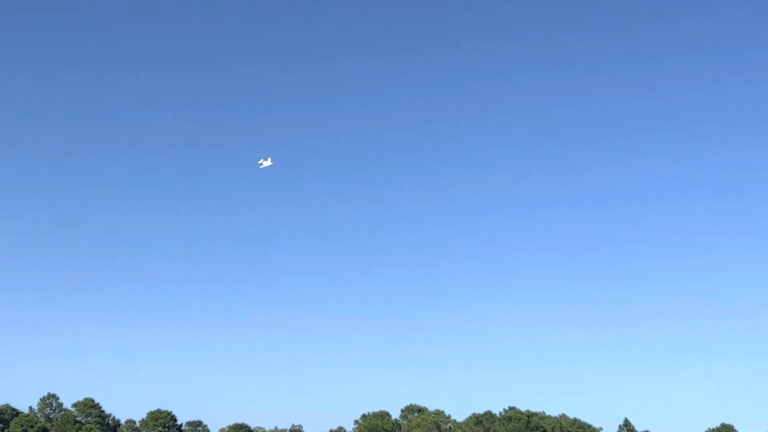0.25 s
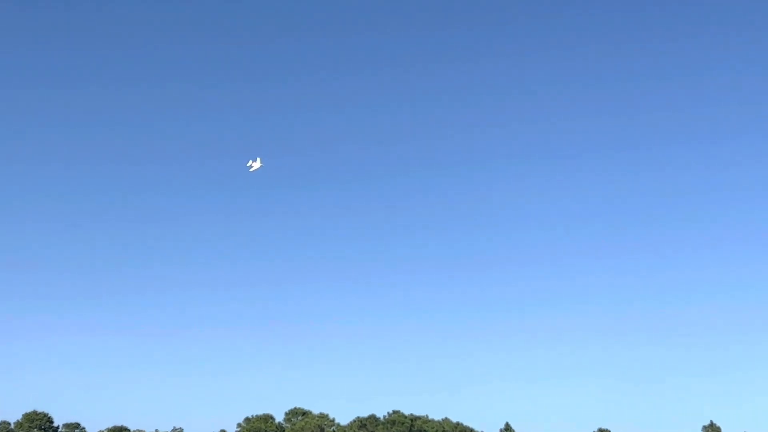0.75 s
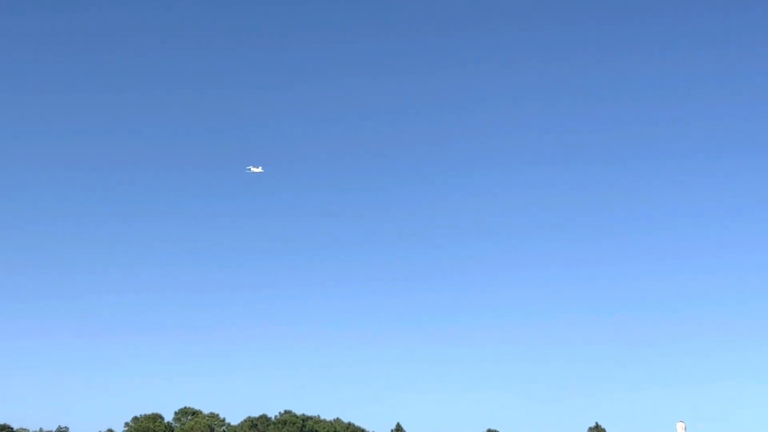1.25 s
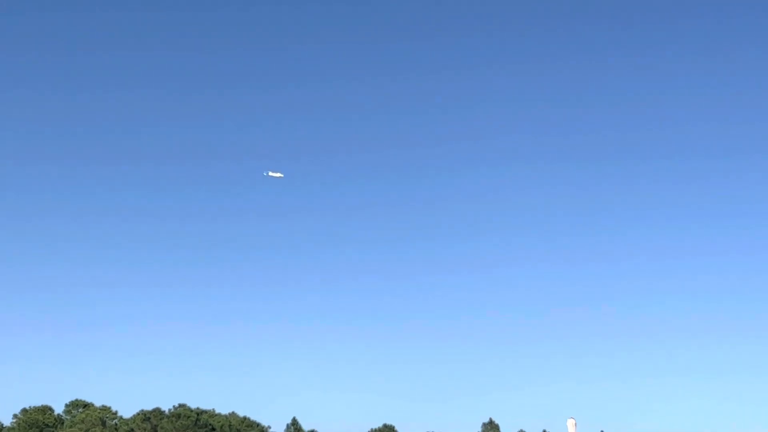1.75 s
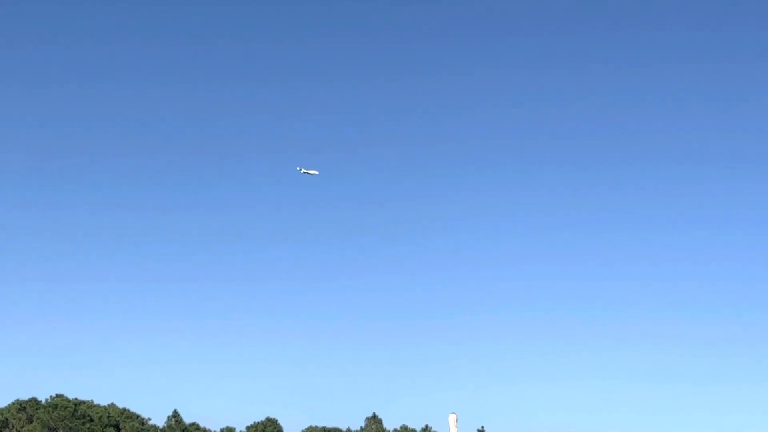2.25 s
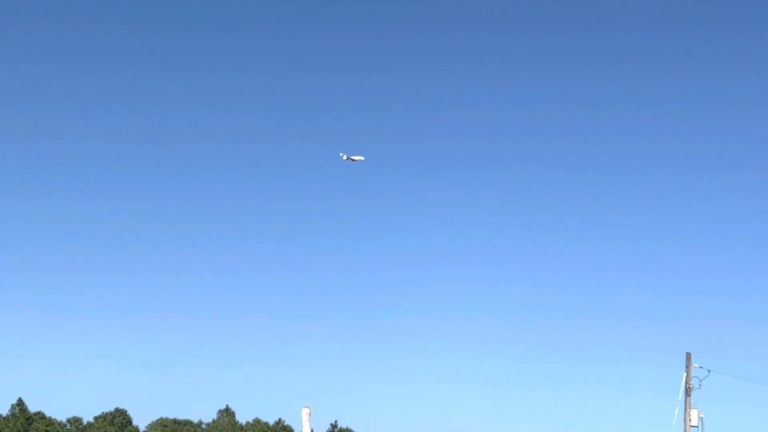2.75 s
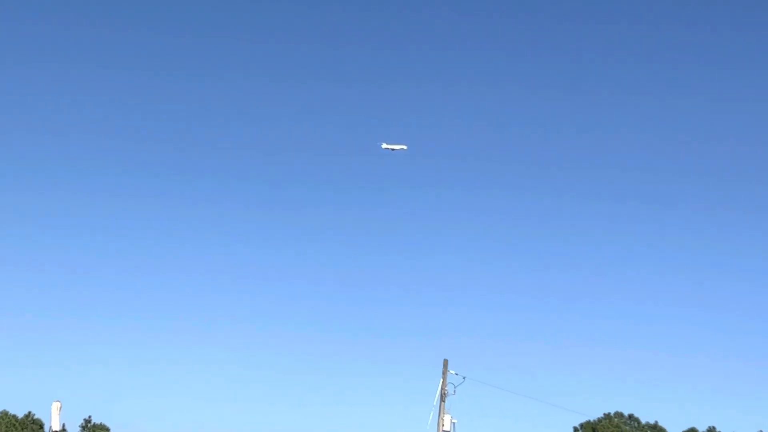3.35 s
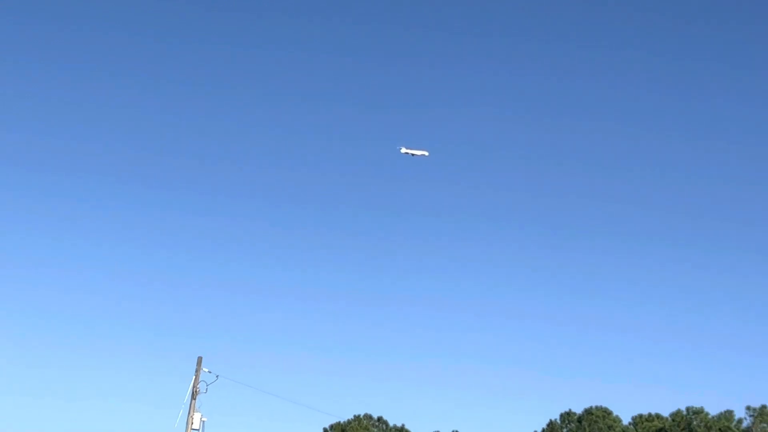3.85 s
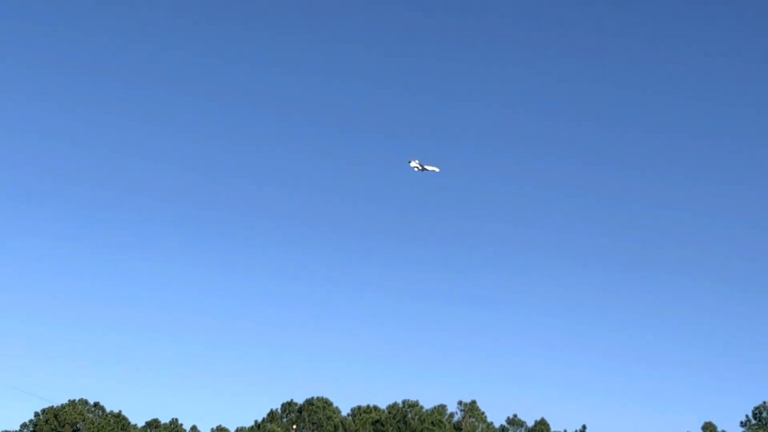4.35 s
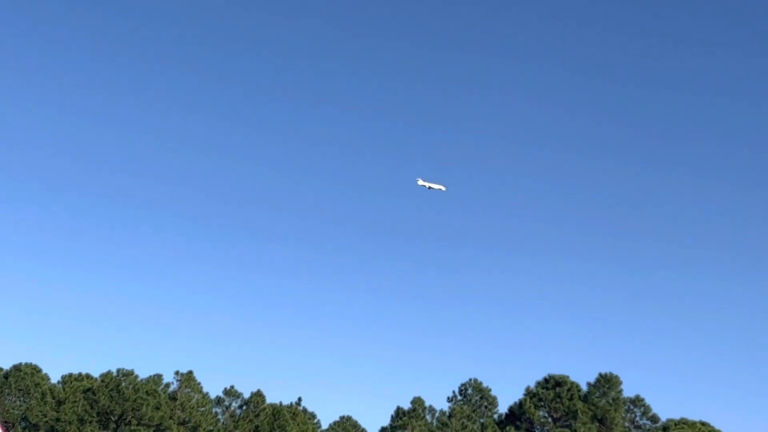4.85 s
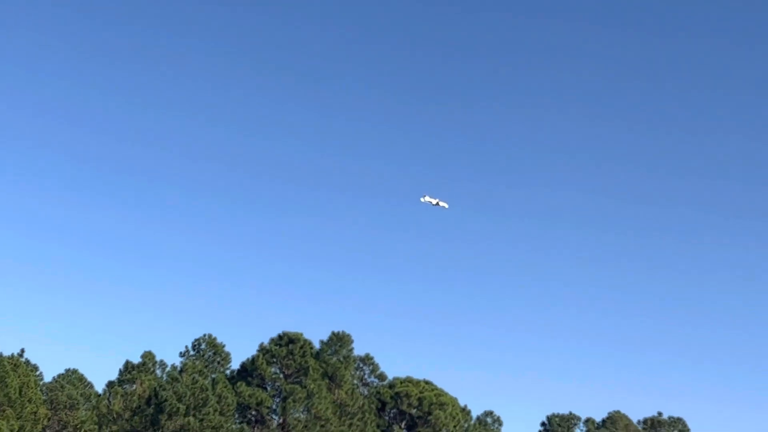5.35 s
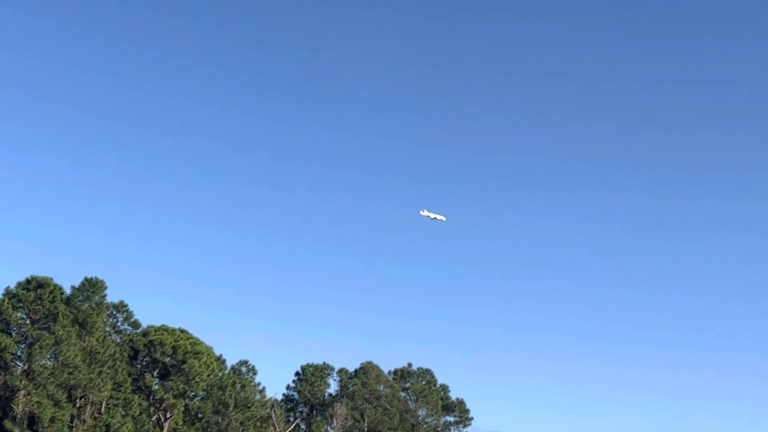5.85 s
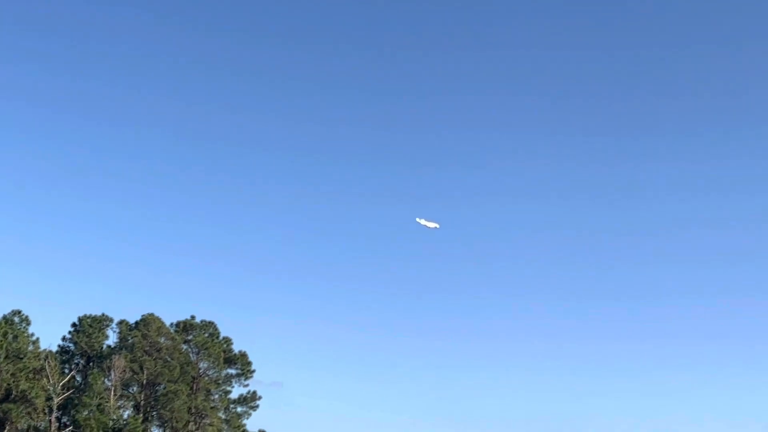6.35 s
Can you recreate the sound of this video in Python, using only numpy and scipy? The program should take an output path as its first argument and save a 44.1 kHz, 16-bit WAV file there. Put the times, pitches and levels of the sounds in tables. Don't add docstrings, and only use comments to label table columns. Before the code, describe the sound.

Outdoors under open sky, a small twin-fan electric model jet passes at a distance. Its high whine flickers in brief beams over a soft duct rush, sags slightly in pitch, then jumps up in two quick steps and becomes stronger and steadier. Wind thumps, flutters and pops on the camera's stereo microphones, heaviest near the end, with one small handling knock early on and faint hiss beneath.

```python
import sys
import numpy as np
from scipy import signal
from scipy.fft import rfft, irfft, next_fast_len
from scipy.io import wavfile
from scipy.ndimage import uniform_filter1d, map_coordinates

SR = 44100
rng = np.random.default_rng(int(sys.argv[2]) if len(sys.argv) > 2 else 0)


def put_to_file(sound):
    columns = np.atleast_2d(sound).T
    safe = np.clip(columns, -1, 1)
    whole_steps = np.round(safe * 32767)
    wavfile.write(sys.argv[1], SR, whole_steps.astype(np.int16))


def decibels_to_gain(level_db):
    exponent = np.asarray(level_db, float) / 20
    return 10 ** exponent


N = 291143

# time in seconds, blade-passing rate in Hz.
BLADE_HZ = [(0.0, 4980), (0.36, 4980), (0.46, 4835), (0.9, 4854), (1.5, 4914), (2.2, 4925), (2.9, 4880),
            (3.9, 4741), (5.0, 4584), (5.225, 4567), (5.32, 4896), (5.45, 4960), (5.54, 5100), (5.61, 5430),
            (5.782, 5540), (5.858, 5928), (6.05, 5922), (6.6, 5863)]
# frequency in Hz, density in dB per Hz.
THUMP = [(15, -120), (25, -27.5), (40, -5.5), (70, 2.5), (120, -2), (200, -17.5), (400, -120)]
# frequency in Hz, density in dB per Hz.
FLUTTER = [(60, -120), (120, 0.5), (200, 1), (350, -5.5), (550, -16), (900, -120)]


def unit(x):
    return x / np.sqrt(np.mean(x ** 2) + 1e-20)


def steady(x, seconds):
    power = np.abs(uniform_filter1d(x ** 2, int(seconds * SR)))
    return unit(x / np.sqrt(power + 1e-20))


def curves(rows):
    s, *cols = np.transpose(rows)
    return [np.interp(np.arange(N) / SR, s, c) for c in cols]


def along(points, hz, axis=1):
    rows = np.transpose(points)
    return np.interp(np.log(hz + 1), np.log(rows[0] + 1), rows[axis])


def wobble(rate):
    coarse = np.arange(0, N + 64, 32)
    knots = rng.standard_normal(int(N * rate / SR) + 4)
    return np.interp(np.arange(N), coarse, map_coordinates(knots, [coarse * rate / SR]))


def bumps(rows, sharp):
    s, fall_s, db = np.transpose(rows)[:, :, None]
    t = np.arange(0, N / SR + .01, .005)
    return t, db - 10 * np.abs((t - s) / np.maximum(fall_s, .03)) ** sharp


def swells(rows, sharp=1.3):
    t, db = bumps(rows, sharp)
    return np.interp(np.arange(N) / SR, t, 20 * np.log10(decibels_to_gain(db).sum(0) + 1e-6))


def filtered(x, response):
    m = next_fast_len(N + 8192)
    return irfft(rfft(x, m) * response(np.fft.rfftfreq(m, 1 / SR)), m)[..., :N]


def shaped_noise(spectrum):
    return filtered(rng.standard_normal(N), lambda hz: decibels_to_gain(along(spectrum, hz)))


def causal(spectrum):
    size = 8192
    cep = irfft(np.log(decibels_to_gain(along(spectrum, np.fft.rfftfreq(size, 1 / SR))) + 1e-4), size)
    cep[1:size // 2] *= 2
    cep[size // 2 + 1:] = 0
    pulse = irfft(np.exp(rfft(cep)), size)
    return pulse / np.abs(pulse).max()


def through(x, spectrum):
    return signal.fftconvolve(x, causal(spectrum))[:N]


def sine(hz, db):
    return np.sqrt(2) * decibels_to_gain(db) * np.sin(2 * np.pi * (np.cumsum(hz) / SR + rng.random()))


def blade_rate():
    inertia_s = .04
    return uniform_filter1d(curves(BLADE_HZ)[0], round(inertia_s * SR))


def fans():
    # peak in seconds, time to fall 10 dB in seconds, peak in dB.
    whine = [(.1, .12, -70.5), (.29, .04, -66), (.57, .05, -75), (.72, .1, -70), (.95, .05, -56),
             (1.1, .06, -66), (1.44, .06, -61), (1.6, .1, -66), (1.93, .13, -61), (2.18, .08, -68),
             (2.28, .03, -58), (2.45, .12, -73), (2.68, .08, -73), (3, .12, -69), (3.15, .1, -68),
             (3.3, .11, -64), (3.45, .06, -70), (3.57, .04, -61), (3.7, .08, -66), (3.9, .12, -63),
             (4, .06, -61), (4.14, .08, -56), (4.28, .06, -61), (4.46, .07, -68), (4.6, .05, -65),
             (4.72, .05, -66), (4.82, .04, -62), (4.89, .04, -60), (4.96, .05, -64), (5.03, .04, -66),
             (5.225, .05, -57.5), (5.33, .05, -63), (5.43, .06, -52), (5.56, .035, -60), (5.66, .05, -68),
             (5.79, .04, -64), (5.88, .05, -50), (5.98, .06, -54), (6.12, .06, -57), (6.27, .1, -55),
             (6.46, .12, -51), (6.6, .1, -52), (1.9, 1.5, -82)]
    # peak in seconds, time to fall 10 dB in seconds, peak in dB.
    octave = [(.73, .04, -77), (.98, .1, -77), (1.15, .06, -78), (1.5, .17, -75), (1.85, .12, -85),
              (2.25, .06, -81), (3.35, .07, -78), (3.48, .05, -79), (3.87, .17, -74), (4.14, .14, -71),
              (4.42, .17, -74), (4.7, .14, -73), (4.93, .12, -67), (5.13, .055, -61), (5.36, .08, -73),
              (5.5, .05, -72), (5.61, .05, -65), (5.68, .04, -69), (5.75, .05, -65), (5.82, .04, -64),
              (5.88, .045, -54), (6.08, .08, -68), (6.25, .1, -52), (6.38, .04, -57), (6.5, .1, -55)]
    # peak in seconds, 10 dB fall in seconds, peak in dB.
    other_lobes = [
        [(.68, .08, -77), (1.3, .25, -73), (2.3, .3, -83), (3.2, .15, -67), (3.5, .15, -66), (3.8, .4, -70),
         (4.3, .4, -71), (5.1, .08, -65), (5.24, .09, -58), (5.96, .06, -76)],
        [(0, .4, -62), (1.8, .6, -59), (3.4, .6, -59), (4.2, .5, -55), (5.15, .4, -61), (6.1, .3, -58)],
        [(5.68, .15, -72), (5.95, .2, -67), (6.25, .3, -65)],
        [(2.6, .4, -77)],
        [(5.6, .12, -78), (6.34, .15, -65)],
        [(5.87, .04, -74), (5.96, .07, -73), (6.27, .12, -77)],
        [(3.6, .3, -93), (4.15, .1, -86), (4.6, .3, -90), (4.97, .06, -82), (5.13, .07, -70), (5.35, .1, -81)],
        [(1.1, .3, -84), (1.7, .4, -84), (2.3, .15, -80)],
        [(.2, .25, -87), (2.8, .3, -82)],
    ]
    twin_settles_s = (5.55, 5.8)
    lag_cruise, lag_full = .0035, .0095
    twin_cruise_db, twin_full_db = -12, -10

    t = np.arange(N) / SR
    shaft_hz = blade_rate() / 12
    twin_hz = shaft_hz * (1 - np.interp(t, twin_settles_s, [lag_cruise, lag_full]))
    twin_db = np.interp(t, twin_settles_s, [twin_cruise_db, twin_full_db])
    calm_db = np.where(shaft_hz > 485, 1.9, np.where(shaft_hz > 418, 4, 2.9))
    out = np.zeros(N)
    for order, lobes in zip([12, 24, 6, 1, 4, 5, 13, 16, 36, 7, 8], [whine, octave] + other_lobes):
        lobe_db = swells(lobes)
        rotors = [(shaft_hz, -1.5)]
        if order in (1, 4, 12, 24):
            rotors.append((twin_hz, twin_db + 7 * (order == 4) - 5 * (order == 24)))
        depth = np.clip(order / 12, .9 * (order > 1), 1) ** .5 * (.4 if order == 24 else 1)
        jitter = .0015 if order == 6 else .0005
        for rotor_hz, rotor_db in rotors:
            air = wobble(36)
            fades = air - .3 * (air ** 2 - .6) + .5 * wobble(70)
            hz = order * rotor_hz * (1 + jitter * wobble(20))
            out += sine(hz, lobe_db + rotor_db + calm_db * depth * fades)
    return out


def whistles():
    # peak in seconds, time to fall 10 dB in seconds, peak in dB.
    switch_lobes = [
        (5.62, .04, -63),
        (5.68, .05, -60),
        (5.75, .05, -63),
        (5.89, .03, -63),
        (5.97, .04, -65),
        (6.03, .02, -64),
        (6.2, .12, -73),
    ]
    # middle in seconds, 10 dB fall in seconds, peak in dB, middle in Hz, glide in Hz per second.
    glides = [
        (5.4, .05, -77, 2050, 900),
        (5.5, .04, -65, 2250, 2700),
        (5.87, .02, -72, 2280, 4500),
        (5.95, .06, -72, 2370, 300),
        (5.63, .04, -70, 5110, 4000),
        (5.76, .11, -71, 5310, 900),
        (5.56, .06, -76, 5560, 3000),
        (5.95, .1, -80, 5420, 0),
        (5.07, .1, -75, 4965, -120),
    ]
    switch_hz = 7735
    t = np.arange(N) / SR
    tones = [(switch_hz - blade_rate(), switch_lobes)]
    for s, fall_s, db, hz, glide in glides:
        tones.append((hz + glide * (t - s), [(s, fall_s, db)]))
    out = np.zeros(N)
    for hz, lobes in tones:
        level_db = swells(lobes, sharp=2.5) + 2.5 * wobble(40)
        out += sine(hz * (1 + .003 * wobble(30)), level_db)
    return out


def rush():
    # frequency in Hz, density in dB per Hz.
    roar_cruise = [(250, -120), (400, -22.5), (560, 3.5), (800, -1.5), (1100, 5), (1500, -12),
                   (2200, -27.5), (3000, -120)]
    roar_full = [(250, -120), (500, -5.5), (1050, -2), (1430, 0.5), (1800, -8), (2500, -15), (3200, -120)]
    hiss = [(900, -120), (1500, 9.5), (2400, 6), (3500, 4.5), (5000, 5), (6500, -8), (8500, -120)]
    fizz = [(4000, -120), (6000, 6), (8000, 3.5), (10000, -8), (12000, 3), (15000, -8.5), (16000, -120)]
    # time in seconds, level in dB.
    nearness = [(0, -76), (.55, -80.5), (.95, -72), (1.3, -70), (1.7, -77), (2.2, -74.5), (2.55, -68.5),
                (3.2, -68), (4.0, -69.5), (4.7, -72), (5.1, -72), (5.45, -77), (5.9, -67.5), (6.35, -65.5),
                (6.6, -69.5)]
    # middle in s, half length in s, change in dB.
    pockets = [(0, 0.026, 12), (0.07, 0.1, -6), (0.28, 0.038, 8.5), (.48, .08, -3), (0.674, 0.1, 7.5),
               (0.84, 0.072, -6), (0.957, 0.047, 6.5), (1.28, 0.16, -6.5), (1.42, 0.064, 6.5),
               (1.115, 0.037, 1), (1.608, 0.066, 2.5), (1.71, 0.024, 0), (1.77, 0.041, 6.5),
               (1.925, 0.098, 6), (2.147, 0.044, -10), (2.295, 0.03, 6.5), (2.358, 0.076, -6.5),
               (2.72, 0.026, 1.5), (2.823, 0.083, -12), (3.503, 0.028, 4), (3.633, 0.032, -6),
               (3.786, 0.033, 0), (4.13, 0.034, -1), (4.312, 0.028, 2), (4.26, 0.073, -4),
               (4.456, 0.055, 3), (4.683, 0.055, -5), (5.002, 0.4, 5), (5.12, .03, 6.5), (5.32, .03, 3),
               (5.366, .025, 1), (5.568, 0.17, 10), (5.68, 0.025, -9), (5.87, 0.029, 2),
               (6.097, 0.045, -1.5), (6.177, 0.036, 0), (6.25, .04, 0), (6.386, 0.12, 2),
               (6.514, 0.052, -3), (5.236, .04, 2.5), (4.993, .03, 0.5)]
    # time in seconds, delay in ms.
    bounce = [(0, 1.5), (.9, 1.45), (2.1, 1.46), (3, 1.59), (3.35, 1.75), (3.9, 1.88), (4.8, 1.92),
              (5.8, 1.7), (6.05, 1.52), (6.35, 1.42), (6.6, 1.4)]
    cruise_hz, full_hz = 5050, 5900
    pocket_hiss, pocket_roar = .52, .16

    near_db, = curves(nearness)
    t, shape_db = bumps([(s, half_s, 0) for s, half_s, db in pockets], sharp=2.4)
    clear_db = np.interp(np.arange(N) / SR, t, np.transpose(pockets)[2] @ decibels_to_gain(shape_db))
    full = np.clip((curves(BLADE_HZ)[0] - cruise_hz) / (full_hz - cruise_hz), 0, 1)
    roar_db = near_db + pocket_roar * clear_db
    hiss_db = near_db + 2 + pocket_hiss * clear_db
    fizz_db = -79.5 + .91 * (near_db + 71) + 8 * full + clear_db + 2.2 * wobble(11)
    gust = wobble(16)
    late = np.arange(N) - curves(bounce)[0] * SR / 1000
    # spectrum, gain, ground reflection share, gust scatter in dB; faster air lifts the roar in pitch
    layers = [(roar_cruise, decibels_to_gain(roar_db + 12) * np.sqrt(1 - full), .6, .8),
              (roar_full, decibels_to_gain(roar_db + 8) * np.sqrt(full), .75, .8),
              (hiss, decibels_to_gain(hiss_db), .5, .9),
              (fizz, decibels_to_gain(fizz_db), .45, 1.5)]
    out = np.zeros(N)
    for spectrum, gain, ground, gust_db in layers:
        direct = shaped_noise(spectrum)
        reflected = map_coordinates(direct, [late], order=1, mode="mirror")
        out += gain * decibels_to_gain(gust_db * gust + 1.28 * wobble(10)) * unit(direct + ground * reflected)
    return out


def buffeting():
    # time in seconds, strength in dB, flutter over thump in dB (squareness).
    breeze = [(0, -47, 2), (.21, -48, -5.5), (.255, -35, -2.5), (.72, -46, -2), (.8, -50, 2.5),
              (1.05, -43, 3), (1.7, -47, -0.5), (1.95, -44, 1), (2.88, -50, 4.5), (3.2, -46, 1),
              (3.27, -51, -11), (4.33, -52.5, -1.5), (4.42, -31, -2), (4.79, -36.5, 5.5),
              (5.08, -55.5, 1.5), (5.165, -25, -4.5), (5.6, -32.5, -1.5), (6.6, -32, -0.5)]
    # peak in seconds, time to fall 10 dB in seconds (less than .03 counts as .03), peak in dB,
    # flutter over thump in dB.
    gusts = [(.43, -0.07, -33, -27), (0.609, 0.11, -40, -34), (.91, -0.02, -43, -11),
             (1.16, -0.03, -45.5, 4), (1.354, 0.0225, -31.5, -2.5), (1.5, 0, -40, -27),
             (1.78, 0.27, -45.5, -9.5), (2.03, -0.4, -50.5, -12), (2.26, 1.4, -59, -33),
             (2.37, -0.13, -37.5, -17), (2.63, -0.02, -49, 2), (3.11, -0.3, -47, -3), (3.36, -0.5, -57, 5),
             (3.592, -0.1551, -34, -14.5), (3.971, 0.02, -34.5, -14), (4.155, 0.01, -41, -31),
             (4.3, 0.01, -35, -23), (4.411, -0.07, -39.5, -11), (4.68, -0.0271, -23, -6.5),
             (4.87, -0.0757, -29, -25), (5.018, -0.05, -38.5, -13), (5.212, 0.1, -37.5, -31),
             (5.468, -0.0374, -26.5, -0.5), (5.82, 0.08, -29.5, -9), (6.169, -0.2, -29.5, -4.5),
             (6.5, 0.8, -39, -46)]
    # frequency in Hz, density in dB per Hz.
    rasp_spectrum = [(200, -120), (400, -5), (600, -2), (850, -13), (1080, -10), (1400, -32), (2200, -55),
                     (3000, -120)]
    turn_s = (4.1, 4.4)
    rasp_side_db, rasp_front_db = -13, -27

    breeze_db, square_db = curves(breeze)
    thump = decibels_to_gain(breeze_db) + decibels_to_gain(swells([(s, fall_s, db) for s, fall_s, db, _ in gusts]))
    flutter_gusts_db = swells([(s, fall_s, db + over_db) for s, fall_s, db, over_db in gusts])
    flutter = decibels_to_gain(breeze_db + square_db) + decibels_to_gain(flutter_gusts_db)
    rasp = flutter * decibels_to_gain(np.interp(np.arange(N) / SR, turn_s, [rasp_side_db, rasp_front_db]))
    lumps, spikes = wobble(30), wobble(120)
    # spectrum, gain, lump depth in dB, spike depth in dB
    layers = [(THUMP, thump * decibels_to_gain(-3), 2.2, 2.5),
              (FLUTTER, flutter * decibels_to_gain(-5), 3, 4),
              (rasp_spectrum, rasp * decibels_to_gain(-1.5), 3.5, 5.5)]
    out = np.zeros(N)
    for spectrum, gain, lump_db, spike_db in layers:
        uneven_db = lump_db * lumps + spike_db * (.7 * spikes + .74 * wobble(120))
        push = rng.standard_normal(N) * decibels_to_gain(uneven_db)
        out += gain * steady(through(push, spectrum), seconds=.17)
    return out


def pops():
    # time in seconds, peak in dB, bass in dB.
    bursts = [(0.101, -33.5, -64), (0.317, -37.5, -39), (0.338, -35, -38), (0.377, -63, -34.5),
              (0.413, -38, -23), (0.511, -38.5, -57), (0.597, -48, -30.5), (0.681, -40.5, -41.5),
              (0.898, -32.5, -58), (1.04, -54, -46), (1.234, -34.5, -37), (1.32, -27, -28),
              (1.637, -31, -32.5), (1.723, -50, -38), (1.948, -37, -36.5), (2.143, -37.5, -54),
              (2.524, -28, -34), (2.637, -34.5, -63), (3.155, -30.5, -51), (3.199, -36, -62),
              (4.378, -49, -29.5), (4.513, -45, -26.5), (4.605, -40, -18), (4.664, -39, -19.5),
              (4.719, -33.5, -20.5), (4.766, -40, -25), (5.16, -48, -26), (5.199, -33.5, -19),
              (5.285, -33, -19.5), (5.492, -28, -32), (5.527, -28.5, -24.5), (5.88, -33, -41),
              (5.9, -42, -27.5), (6.079, -40, -29.5), (6.214, -34, -27.5), (6.265, -25, -26)]
    # frequency in Hz, density in dB per Hz.
    pop_spectrum = [(200, -120), (400, 1.5), (650, 2), (950, -13), (1500, -21.5), (2600, -120)]
    sharp, deep = np.zeros((2, N))
    for s, db, bass_db in bursts:
        sharp[round(s * SR)] = decibels_to_gain(db - 7)
        deep[round(s * SR)] = decibels_to_gain(bass_db)
    return through(sharp, pop_spectrum) + through(deep, FLUTTER) + through(decibels_to_gain(-6.5) * deep, THUMP)


def thuds():
    # time in seconds, peak in dB.
    pushes = [(0.369, -23.5), (0.827, -29.5), (0.894, -25), (0.964, -30), (1.352, -29), (1.389, -26.5),
              (4.384, -27.5), (4.418, -26), (5.175, -22), (5.26, -15), (5.448, -19), (5.633, -19.5),
              (5.798, -19), (5.913, -17.5), (6.162, -20), (6.328, -21.5), (6.389, -23.5), (6.442, -20.5),
              (6.55, -16)]
    push = np.zeros(N)
    for s, db in pushes:
        push[round(s * SR)] = decibels_to_gain(db - 4)
    return through(push, THUMP)


def wind():
    trail_cycles = .8005

    def trail(hz):
        bass_hz = np.clip(hz, 40, 700)
        return np.exp(-2j * np.pi * trail_cycles * (np.log(bass_hz) - bass_hz / 700))

    return filtered(buffeting() + pops(), trail) + thuds()


def ticks():
    # time in seconds, peak in dB, bright edge in dB.
    handling = [
        (0.393, -68, -70),
        (2.0519, -43, -70),
    ]
    # frequency in Hz, density in dB per Hz.
    body_spectrum = [(150, -120), (500, 23), (1500, 6.5), (3000, -1), (6000, -12.5), (13000, -14.5),
                     (15500, -8), (17000, -120)]
    edge_spectrum = [(2200, -120), (3300, -6), (5000, 5), (7000, 2), (9000, -4), (11000, -120)]
    out, t = np.zeros((2, N + SR)), np.arange(SR // 20) / SR
    for s, db, bright_db in handling:
        decay = decibels_to_gain([[db - 12.5], [bright_db]] - 60 * t / .029)
        out[:, round(s * SR):][:, :len(t)] += decay * rng.standard_normal(len(t))
    return through(out[0, :N], body_spectrum) + through(out[1, :N], edge_spectrum)


def preamp():
    # frequency in Hz, density in dB per Hz.
    self_noise = [(8000, -120), (10500, 5), (12000, 7), (15000, -4), (16000, -120)]
    return decibels_to_gain(-89.5 + 1.2 * wobble(8.1)) * unit(shaped_noise(self_noise))


def ports(x):
    # frequency in Hz, left port's lead in radians.
    lead_rad = [(900, .65), (2100, .03), (5900, .7), (7400, .05), (9200, 1.85), (9650, 2.1), (10100, 3.1),
                (10800, 4.0), (13200, 6.28), (15000, 7.1)]
    # frequency in Hz, unrelated share in dB.
    unrelated = [(200, -12), (1300, -22), (2500, -36), (3550, -4), (5600, -44), (8300, -22.5), (13800, -43),
                 (15100, -5)]
    # time in seconds, edge in Hz.
    mono_edge = [(0, 385), (2.5, 680), (5.3, 430), (6.6, 132)]
    mid = filtered(x, lambda hz: np.cos(along(lead_rad, hz) / 2))
    lead = filtered(x, lambda hz: 1j * np.sin(along(lead_rad, hz) / 2))
    loose = filtered(x, lambda hz: decibels_to_gain(along(unrelated, hz)))
    hz, t, z = signal.stft(loose, SR, nperseg=1024)
    z = z * np.exp(2j * np.pi * rng.random(z.shape))
    z = z + signal.stft(lead, SR, nperseg=1024)[2]
    edge_hz = np.interp(t, *np.transpose(mono_edge))
    z = z / (1 + (edge_hz / (hz[:, None] + 1)) ** 20)
    side = signal.istft(z, SR, nperseg=1024)[1][:N]
    return np.array([mid + side, mid - side])


def scene():
    close = np.clip((N - np.arange(N)) / (.006 * SR), 0, 1)
    return ports(close * (fans() + whistles() + rush() + wind() + ticks() + preamp()))


def thinned_top(x):
    start_s, edge_hz, under_hz, rest_db = (6.165, 12080, 11520, -45)
    scrap_share = .11
    hz, t, z = signal.stft(np.array([x[0] + x[1], x[0] - x[1]]) / 2, SR, nperseg=2048)
    scraps = rng.random((len(hz) // 14 + 1, len(t))) < scrap_share
    scraps = scraps.repeat(14, axis=0)[:len(hz)]
    band = np.array([(hz > edge_hz) | (hz > 10000) & (hz < under_hz), hz > edge_hz])
    lost = band[:, :, None] & (t > start_s) & ~scraps
    mid, side = signal.istft(z * np.where(lost, decibels_to_gain(rest_db), 1), SR, nperseg=2048)[1][:, :N]
    return np.array([mid + side, mid - side])


def top_cut(x):
    return signal.sosfilt(signal.butter(12, 15680, fs=SR, output="sos"), x)


def record(dry):
    rounded = dry / (1 + np.abs(dry / .15) ** 4) ** (1 / 4)
    mix = thinned_top(rounded)
    return top_cut(mix)


dry = scene()
out = record(dry)
put_to_file(out)
```